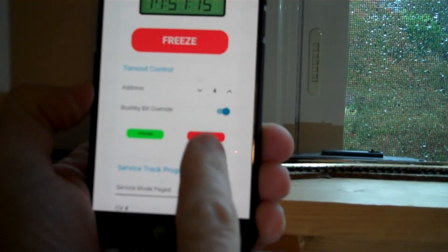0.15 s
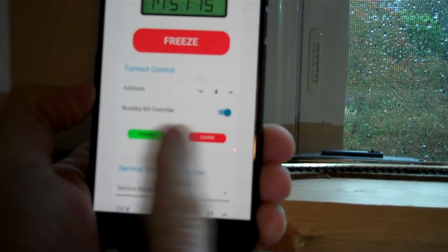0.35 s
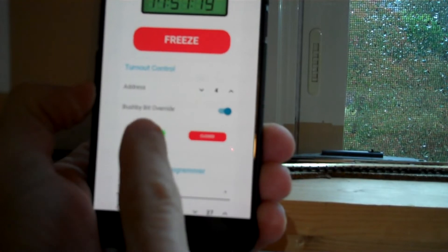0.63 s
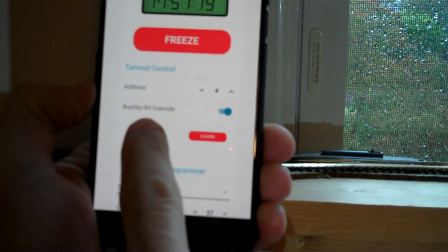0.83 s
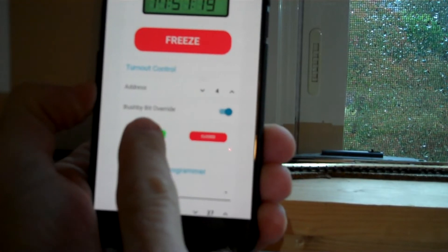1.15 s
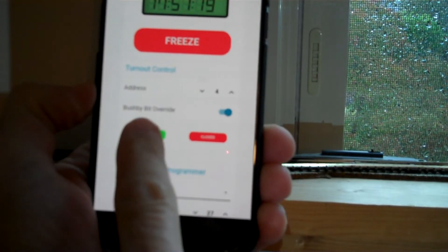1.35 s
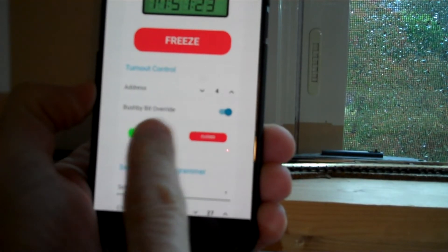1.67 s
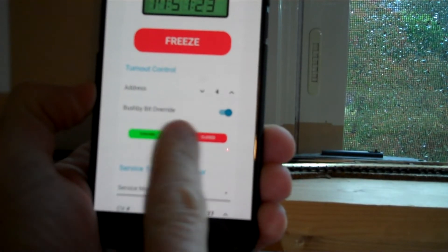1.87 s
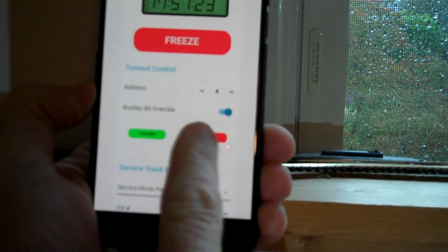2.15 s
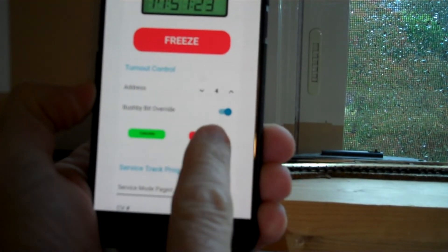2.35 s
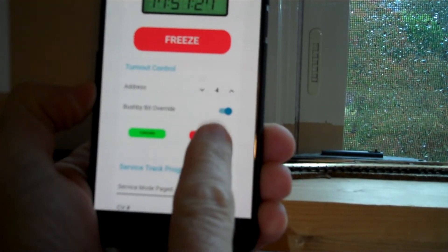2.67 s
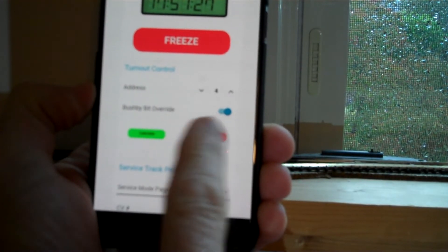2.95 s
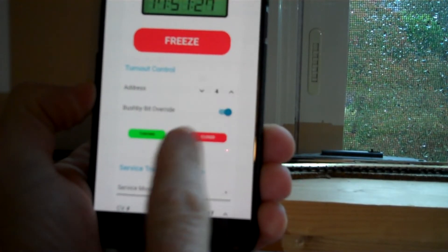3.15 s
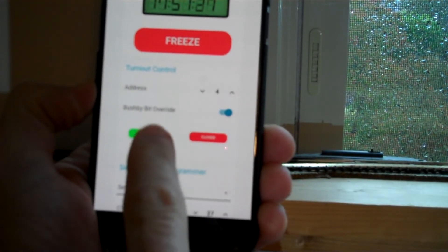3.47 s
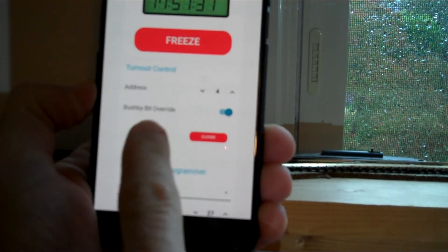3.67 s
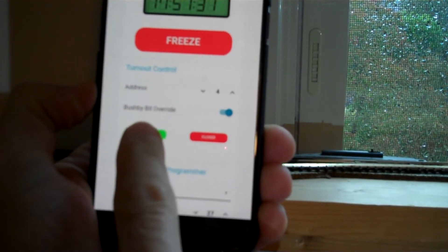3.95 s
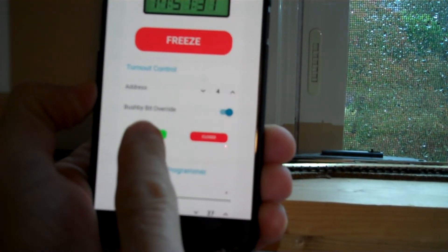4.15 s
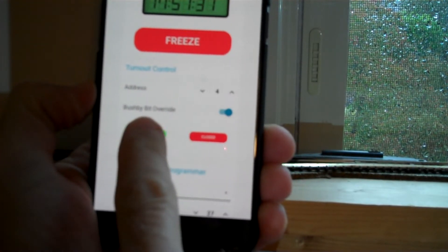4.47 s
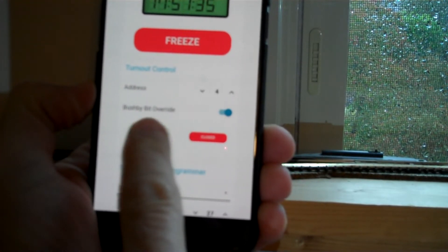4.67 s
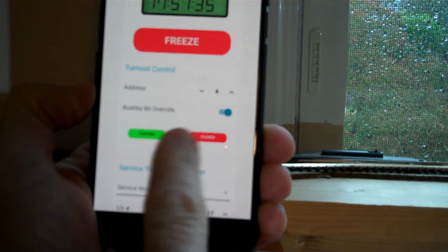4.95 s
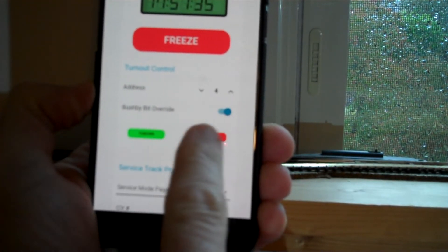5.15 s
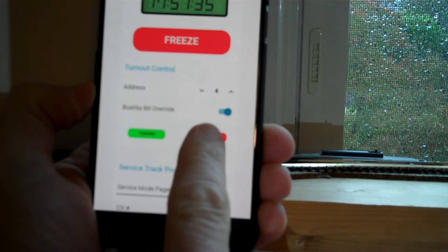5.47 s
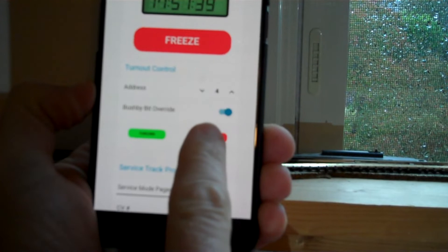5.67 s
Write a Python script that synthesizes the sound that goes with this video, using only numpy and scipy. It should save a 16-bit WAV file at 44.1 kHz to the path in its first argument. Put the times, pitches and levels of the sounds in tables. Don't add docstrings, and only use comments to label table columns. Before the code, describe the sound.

Steady soft hiss and a barely audible low engine drone open the scene. Then a solenoid throws with a piercing, dry steel clack, pauses, throws again hardest of all, and later a third time, slightly duller. Each has a tight flutter of contacts, a short board thud and under half a second of room reflection. Tiny spring ticks follow. Close, small stereo microphones, nearly overloaded by the loudest snap.

```python
import sys
import numpy as np
from scipy import signal
from scipy.fft import rfft, irfft, next_fast_len
from scipy.io import wavfile

SR = 44100
rng = np.random.default_rng(int(sys.argv[2]) if len(sys.argv) > 2 else 0)


def level_to_linear(level):
    exponent = np.asarray(level, float) / 20
    return 10 ** exponent


def output_pcm(signal):
    pcm = np.clip(np.atleast_2d(signal).T, -1, 1) * 32767
    wavfile.write(sys.argv[1], SR, np.round(pcm).astype(np.int16))


N = 256662

# frequency in Hz, level in dB per Hz.
HISS_COLOUR = [(12, -32.5), (20, 3.5), (55, -6.5), (113, -6), (170, -7.5), (243, -4), (340, -5.5),
               (600, -5), (1300, -5.5), (3000, -8.5), (6000, -10.5), (7600, -11.5), (8200, -14.5),
               (14100, -17)]
# frequency in Hz, left over right in dB.
HISS_TILT = [(60, 3.5), (110, 0.5), (200, 3.5), (380, 6), (700, 7.5), (1280, 5), (2370, 4), (4380, 0.5),
             (8080, 3), (14900, -2)]
# frequency in Hz, correlation from -1 to 1.
HISS_ALIKE = [(25, -.7), (45, -0.7), (70, 0.2), (150, 0.26), (400, .05), (5000, 0.00081), (12000, -0)]
# frequency in Hz, rms level in dB, width in Hz.
WHINES = [(1688, -84, 3), (2510, -85, 8), (6293, -87, .3), (6350, -80.5, .1), (7337, -82, .2)]
# time in seconds, rms level in dB.
DRONE = [(0, -76), (1.2, -77), (1.6, -84), (5.82, -92)]
# resonance in Hz, width in Hz, lift in dB.
PORT_CAVITIES = [(6900, 2100, 12), (5820, 2500, 8.5)]
# frequency in Hz, gain in dB.
ROLL_OFF = [(100, 8.5), (13800, 6), (14500, -5.5), (16000, -18), (22000, -50)]
# frequency in Hz, gain in dB.
SHADE = [(100, -3.5), (600, 1), (4000, -1), (6000, 1.5), (7000, -6), (9000, -12), (13000, -11.5),
         (22000, -12.5)]
# frequency in Hz, t60 in seconds.
ROOM_DECAY = [(200, .15), (700, 0.37), (1100, 0.53), (2500, 0.37), (5000, 0.49), (7000, 0.44),
              (10000, 0.23), (14000, .18)]
# frequency in Hz, level in dB.
ROOM_COLOUR = [(100, -62.5), (400, -48.5), (750, -51.5), (1080, -41.5), (1500, -46), (2500, -40.5),
               (4000, -48), (6000, -51), (7500, -45.5), (9000, -47), (11000, -49.5), (13000, -53),
               (15000, -71.5)]
# mode in Hz, level in dB, t60 in seconds.
BOARD = [(205, -25.5, 0.033), (587, -14.5, 0.035), (757, -10, 0.065), (1093, -8.5, 0.062),
         (1160, -8, 0.035), (1050, -22, 0.18)]
# mode in Hz, level in dB, t60 in seconds.
HOUSING = [(1320, -4.5, .018), (1934, -8, .015), (2380, -3, 0.017), (2730, -2, 0.01)]
# frequency in Hz, level in dB.
THUD = [(60, -43.5), (300, -23), (600, -12), (1100, -2.5), (2400, 2), (3500, -5), (5000, -17), (22000, -54)]
# mode in Hz, level in dB, t60 in seconds.
STEEL = [(4090, -26, 0.063), (4600, -26, 0.055), (5420, -28, 0.035), (6010, -26.5, 0.045),
         (5880, -35.5, 0.1), (6997, -30, 0.039), (6940, -31.5, .08), (7800, -27.5, 0.055),
         (8070, -29, 0.053), (8453, -21.5, .06)]
# frequency in Hz, level in dB.
CRACK = [(100, -39), (500, -28.5), (1500, -4), (3000, -9), (5000, 2.5), (7000, 1.5), (10000, 2),
         (13800, -10.5), (16000, -16), (22000, -33)]
# peak time in seconds, left peak in dB, ring in Hz, lead-in in dB, chatter in dB
BLOWS = [
    (1.5329, -6, 7700, -16, -6),
    (1.5347, -5, 7300, -7, -4),
    (1.5392, -4, 7300, -4, -11),
    (2.9062, -7, 7300, -5, 0),
    (2.9090, -4.5, 6950, -3, -11),
    (2.9114, 1.5, 6950, -17, -12.5),
    (4.6010, -12, 7000, -3, -7),
    (4.6041, -4.5, 7100, -9, -7),
    (4.6078, -6.5, 7200, 0, -5.5),
]
# end stop in seconds, knock in dB, settling in dB, settling ring in Hz, left lean in dB.
THROWS = [
    (1.5392, -33, -21, 7500, 5.5),
    (2.9114, -30, -19, 6950, 5),
    (4.6078, -31.5, -19, 5400, 9),
]
# seconds after the end stop, dB over its knock, share of deep thump in dB.
TO_BOARD = [
    (-.0067, -10.5, -20),
    (-.0004, 1.5, -13.5),
    (.0022, 2, -9),
    (.0058, 0.5, -0.5),
]
# time in seconds, peak in dB, ring in Hz, knock in dB.
TICKS = [
    (1.9505, -42.5, 4600, -59),
    (1.9529, -39, 5700, -53),
    (1.9543, -43, 7150, -52.5),
    (3.201, -57, 6500, -64),
    (4.905, -53, 4600, -61),
]

LEAD_S, CHATTER_S, SECOND_LOSS_DB = .0007, .00095, 1.5
LEAD_PITCH, RAIL_PITCH = .93, .89
SETTLE_S, SETTLE_GROWS, SETTLE_LOSS_DB = .0031, 1.45, 2
LEAN_DB_PER_KHZ, LEAN_HZ = 7, 6930
TICK_KNOCK_S, TICK_DEEP_DB, TICK_LEAN_DB = 0.0017, -10, 1.5


def unit(x):
    return x / np.sqrt(np.mean(x ** 2) + 1e-20)


def along(points, hz):
    f, v = np.transpose(points)
    return np.interp(np.log(hz + 1), np.log(f + 1), v)


def filtered(x, response):
    n = x.shape[-1]
    m = 2 * next_fast_len(n // 2 + 2048)
    return irfft(rfft(x, m) * response(np.fft.rfftfreq(m, 1 / SR)), m)[..., :n]


def causal(points, hz):
    cepstrum = irfft(np.log(level_to_linear(along(points, hz))))
    half = len(cepstrum) // 2
    cepstrum[1:half] *= 2
    cepstrum[half + 1:] = 0
    return np.exp(rfft(cepstrum))


def resonance(f, centre, width):
    return 1j * f * width / (centre * centre - f * f + 1j * f * width)


def add(out, s, x):
    out[:, round(s * SR):][:, :x.shape[1]] += x


def hiss():
    def spread(f):
        angle = np.arccos(np.clip(along(HISS_ALIKE, f), -1, 1)) / 2
        return level_to_linear(along(HISS_COLOUR, f)) * [np.cos(angle), np.sin(angle)]

    shared, opposed = filtered(rng.standard_normal((2, N)), spread)
    pair = np.array([shared + opposed, shared - opposed])
    pair = filtered(pair, lambda f: level_to_linear(along(HISS_TILT, f) * np.array([[.5], [-.5]])))
    return level_to_linear(-60.5) * unit(filtered(pair, lambda f: f < 14200))


def hum_tone(centre, width):
    return unit(filtered(rng.standard_normal((2, N)), lambda f: 1 / (1 + ((f - centre) / width) ** 2)))


def whines():
    fade = level_to_linear(np.interp(np.arange(N) / SR, *np.transpose(DRONE)))
    drone = fade * hum_tone(107, 9)
    return drone + sum(level_to_linear(db) * hum_tone(hz, width) for hz, db, width in WHINES)


def room(hz):
    f, t, z = signal.stft(rng.standard_normal((2, SR * 2 // 5)), SR, nperseg=256)
    colour = along(ROOM_COLOUR, f) + 3 / (1 + ((f - hz) / 900) ** 2)
    level_db = colour[:, None] - 60 * t / along(ROOM_DECAY, f)[:, None]
    tail = signal.istft(z * level_to_linear(level_db), SR, nperseg=256)[1]
    since = np.arange(tail.shape[1]) / SR
    return tail * (1 - np.exp(-(since / 0.0061) ** 2))


def ports(x):
    def response(f):
        lift = np.array([1 + level_to_linear(db) * resonance(f, hz, width) for hz, width, db in PORT_CAVITIES])
        left_delay = np.exp(-2j * np.pi * f * 2 / SR)
        return lift * causal(ROLL_OFF, f) * [left_delay, causal(SHADE, f)]

    return filtered(x, response)


def ring(modes, t, scatter_db, attack):
    hz, db, t60 = np.transpose(modes)[:, :, None]
    chance = rng.standard_normal((4, len(modes), 1))
    phase = 3 * chance[0] + np.array([chance[1], -chance[1]]) * hz / 9000
    level = level_to_linear(db + scatter_db * chance[2] - 60 * t / t60)
    return (level * np.sin(2 * np.pi * hz * t + phase)).sum(axis=1) * (1 - np.exp(-t / attack))


def burst(colour, t, t60, apart):
    noise = rng.standard_normal((3, len(t)))
    return level_to_linear(-60 * t / t60) * filtered(noise[0] + apart * noise[1:], lambda f: causal(colour, f))


def knock(db, deep_db):
    t = np.arange(SR // 5) / SR
    shell = ring(HOUSING, t, scatter_db=1.5, attack=.0005)
    shell = shell + level_to_linear(3.5) * burst(THUD, t, t60=.025, apart=0.46)
    thump = level_to_linear(deep_db + 1.5) * ring(BOARD, t, scatter_db=2.0, attack=.002)
    return ports(level_to_linear(db - 5.5) * (shell + thump))


def knocks():
    heavy = [(s + after_s, db + over_db, deep_db)
             for s, db, *_ in THROWS for after_s, over_db, deep_db in TO_BOARD]
    return heavy + [(s + TICK_KNOCK_S, db, TICK_DEEP_DB) for s, _, _, db in TICKS]


def contact(db, hz, pan_db):
    t = np.arange(SR // 10) / SR
    part = [(hz, 0, .0048), (hz * 1.17, -13, .004), (hz * 1.1, -13, .004)]
    struck = ring(part, t, scatter_db=4.5, attack=0.00036)
    crack_db = -6 - .15 * db
    crack = level_to_linear(crack_db) * burst(CRACK, t, t60=0.0038, apart=0.7)
    lasting = level_to_linear(-10) * ring(STEEL, t, scatter_db=6.5, attack=0.00016)
    steel = ports(struck + crack + lasting)
    peak = np.abs(steel).max(axis=1, keepdims=True)
    return steel / peak * level_to_linear([[db + .5], [db - pan_db + .5]])


def touches():
    rows = []
    for (s, db, hz, lead_db, chatter_db), (next_s, *_) in zip(BLOWS, BLOWS[1:] + [(N / SR,)]):
        rows += [(s - LEAD_S, db + lead_db, LEAD_PITCH * hz), (s, db, hz)]
        chatter = [(s + CHATTER_S, db + chatter_db, RAIL_PITCH * hz),
                   (s + 2 * CHATTER_S, db + chatter_db - SECOND_LOSS_DB, hz)]
        rows += [touch for touch in chatter if touch[0] < next_s - CHATTER_S - LEAD_S / 8]
    for s, _, db, hz, _ in THROWS:
        for k in range(5):
            pitch = hz * (1 + .04 * rng.standard_normal())
            rows.append((s + SETTLE_S * SETTLE_GROWS ** k, db - SETTLE_LOSS_DB * k, pitch))
    stop_s, *_, lean_db = np.transpose(THROWS)

    def lean(s, hz):
        return np.interp(s, stop_s, lean_db) + LEAN_DB_PER_KHZ * min(hz - LEAN_HZ, 300) / 1000

    thrown = [(s, db, hz, lean(s, hz)) for s, db, hz in rows]
    return thrown + [(s, db, hz, TICK_LEAN_DB) for s, db, hz, _ in TICKS]


def switch():
    near, far = np.zeros((2, 2, N + SR))
    for s, db, hz, pan_db in touches():
        add(near, s - .0004, contact(db, hz, pan_db))
        add(far, s, level_to_linear(db) * room(hz))
    for s, db, deep_db in knocks():
        add(near, s, knock(db, deep_db))

    def lasting(f):
        steel = sum(resonance(f, hz, 88.5) for hz, *_ in STEEL)
        board = resonance(f, BOARD[-1][0], 50)
        return 1 + level_to_linear(-7) * steel + level_to_linear(-6.5) * board

    return (near + ports(filtered(far, lasting)))[:, :N]


def scene():
    return switch() + hiss() + whines()


def roll_off(x):
    return signal.sosfilt(signal.butter(12, 15510, fs=SR, output="sos"), x)


def record(dry):
    bent = dry + .04 * dry ** 4
    return roll_off(np.clip(bent, -1, 1))


dry = scene()
out = record(dry)
output_pcm(out)
```